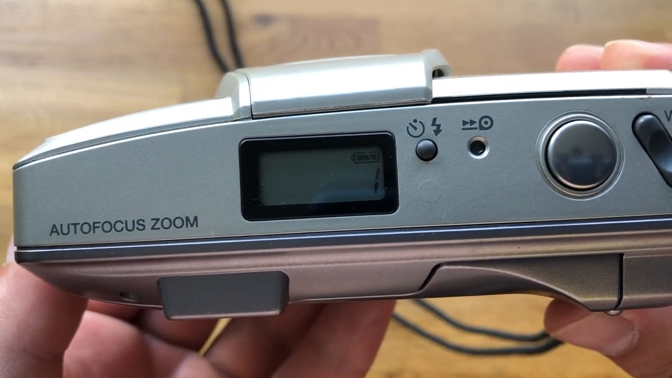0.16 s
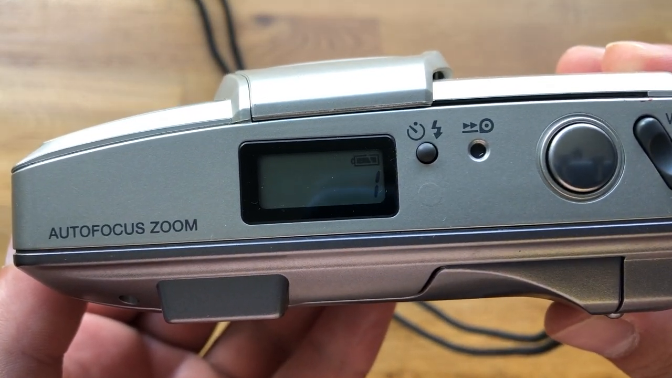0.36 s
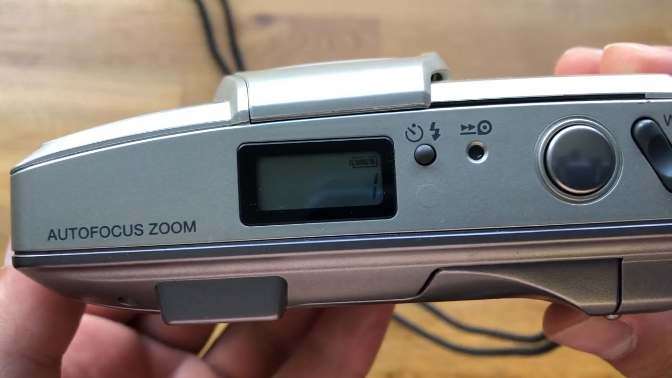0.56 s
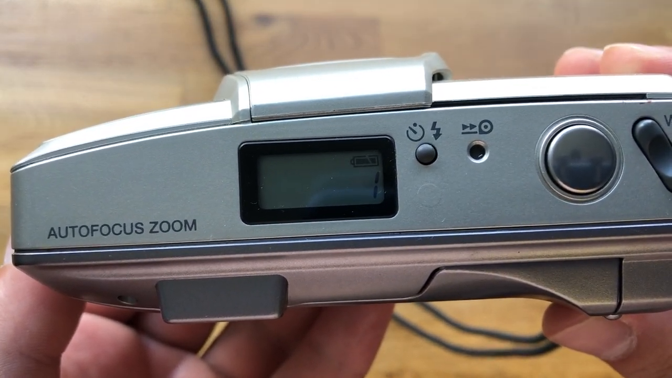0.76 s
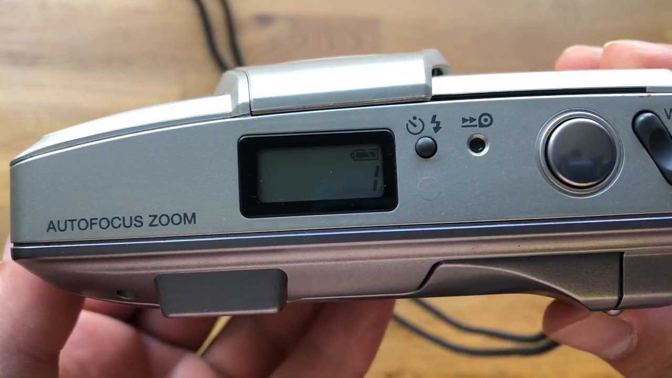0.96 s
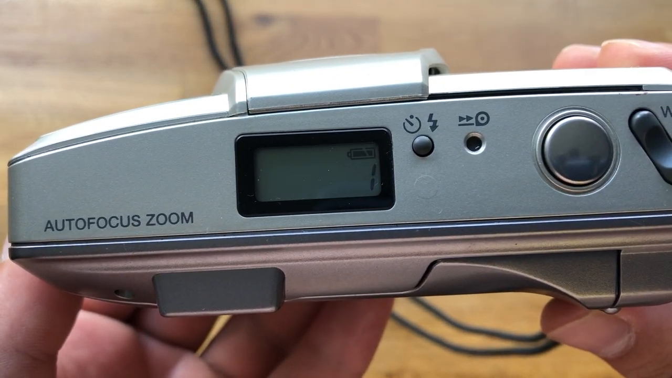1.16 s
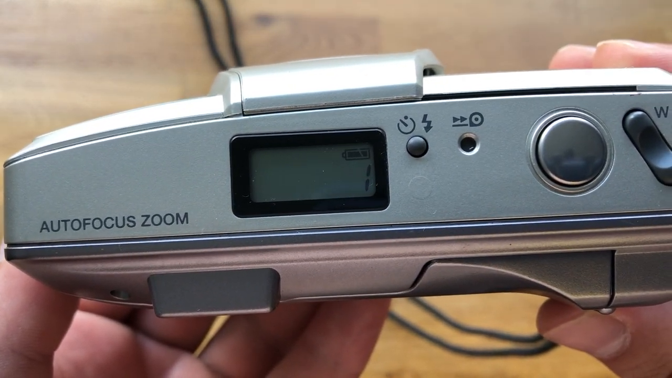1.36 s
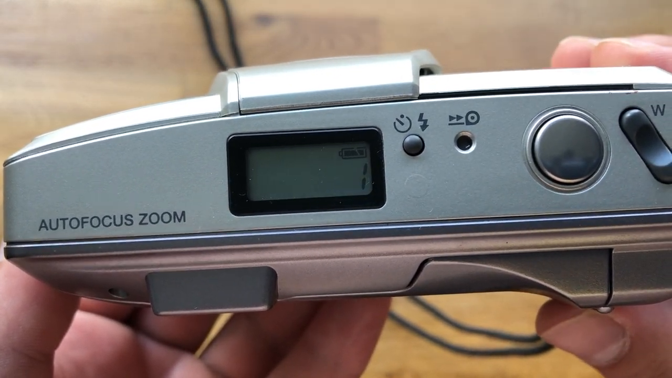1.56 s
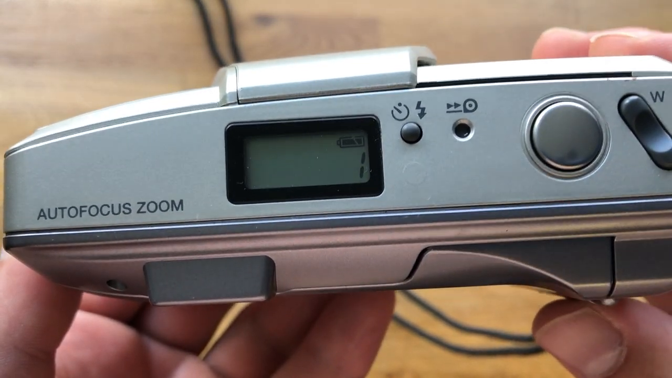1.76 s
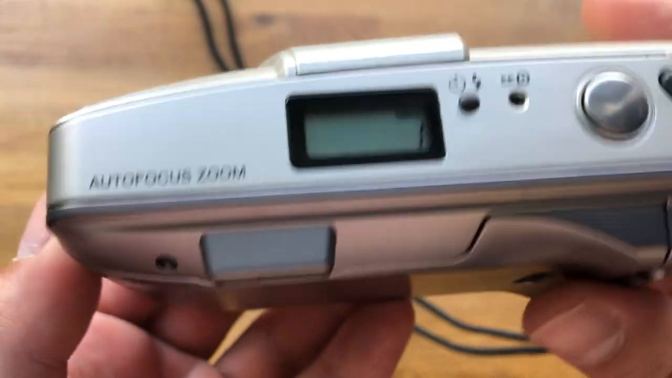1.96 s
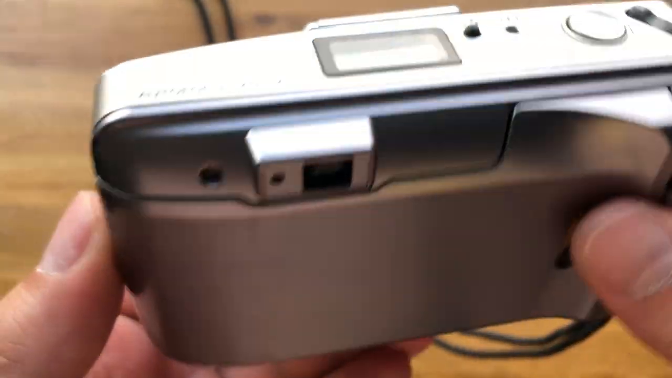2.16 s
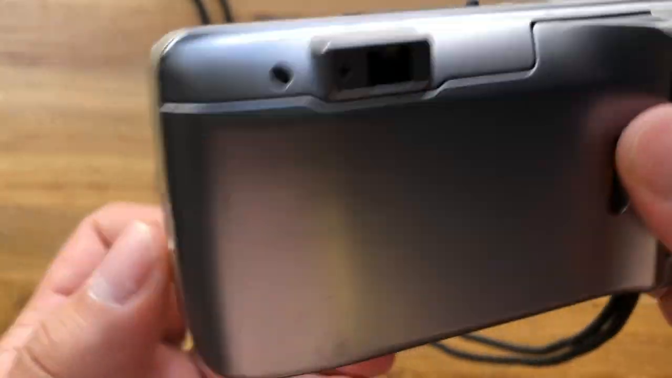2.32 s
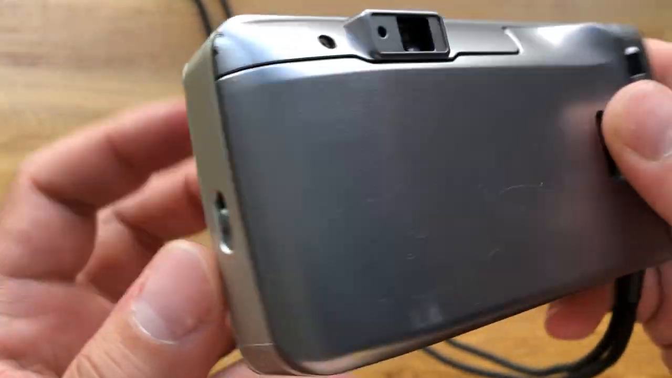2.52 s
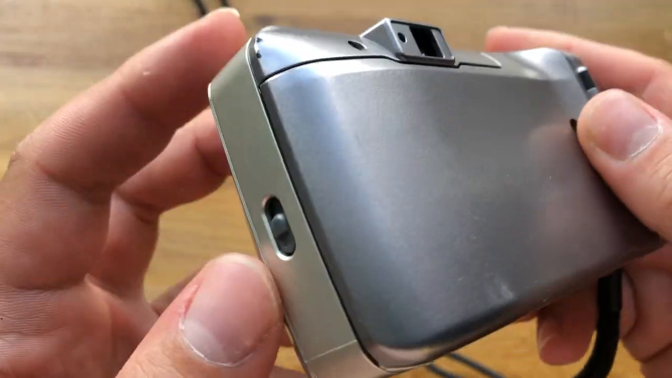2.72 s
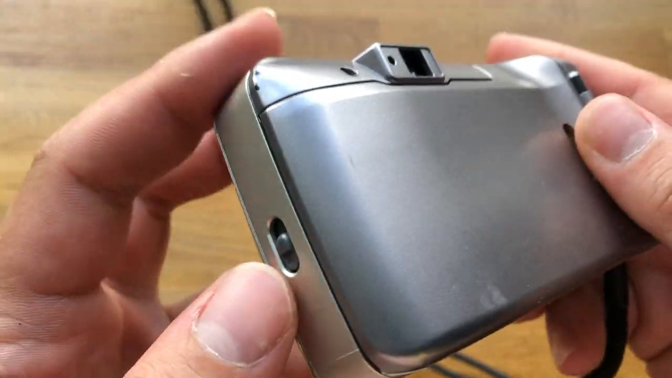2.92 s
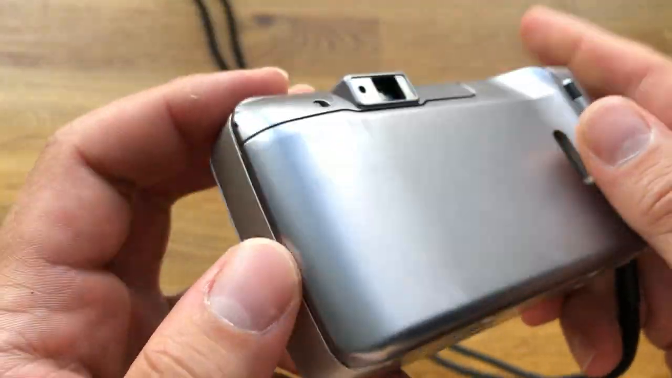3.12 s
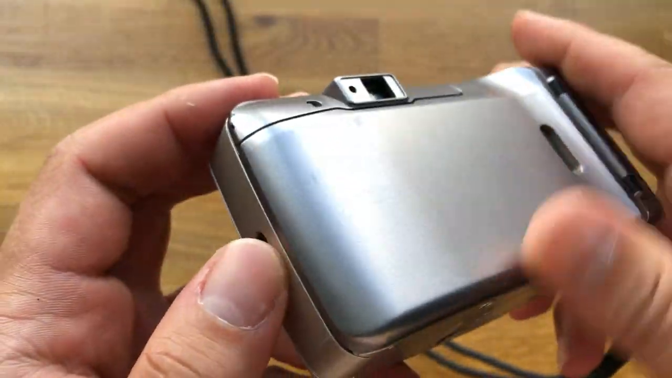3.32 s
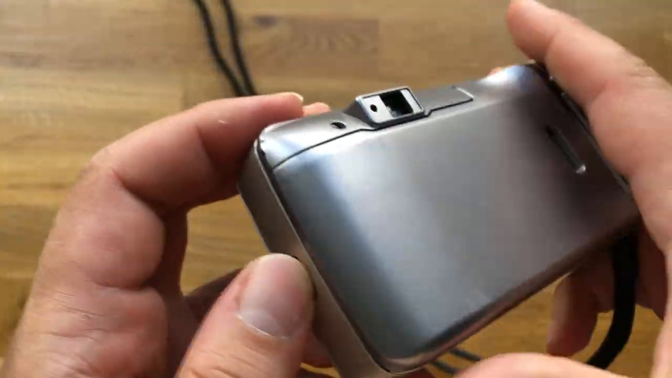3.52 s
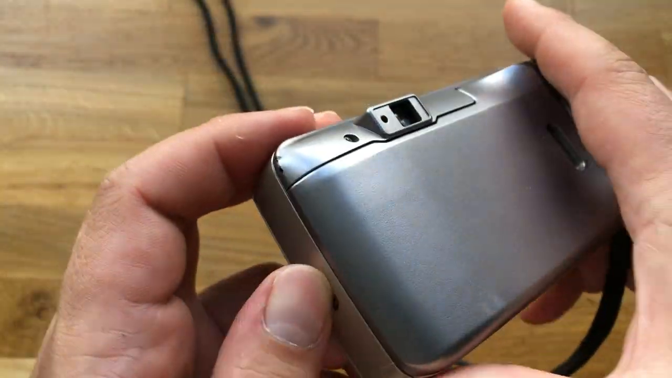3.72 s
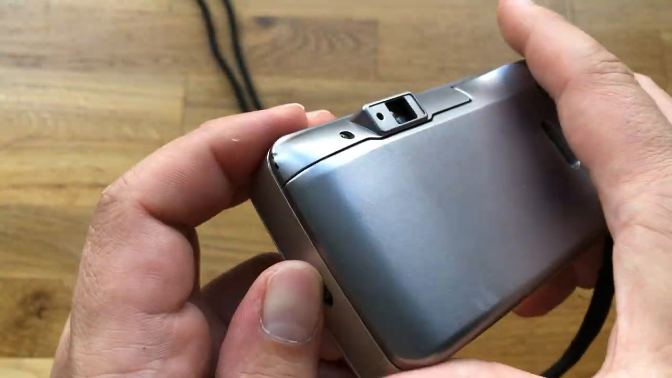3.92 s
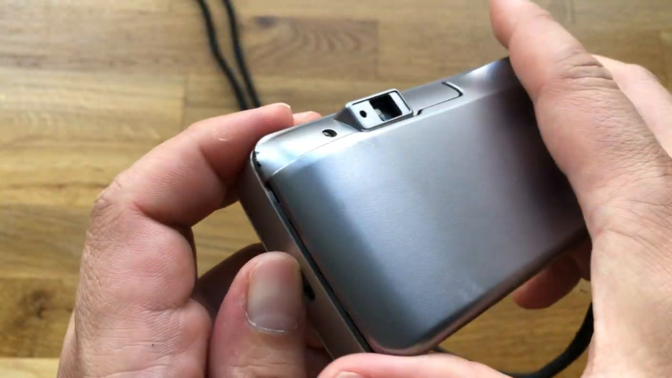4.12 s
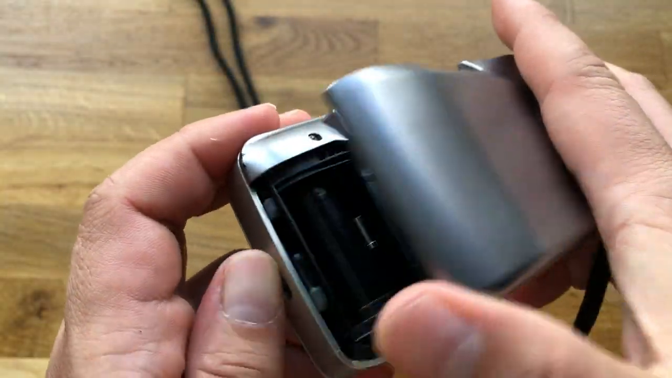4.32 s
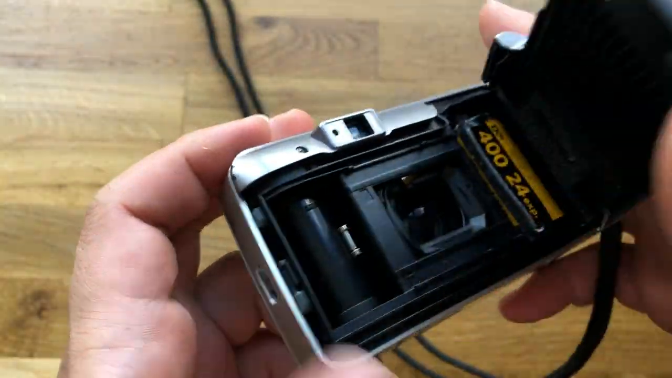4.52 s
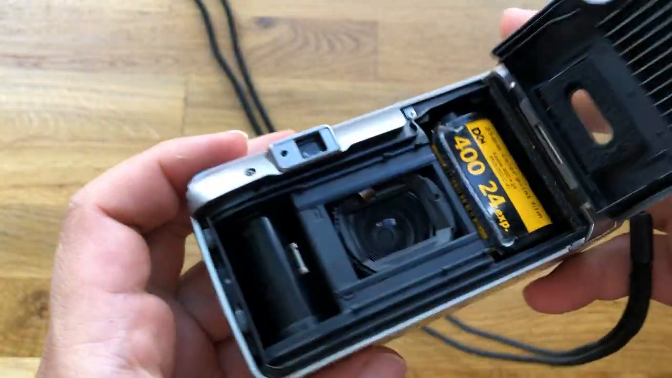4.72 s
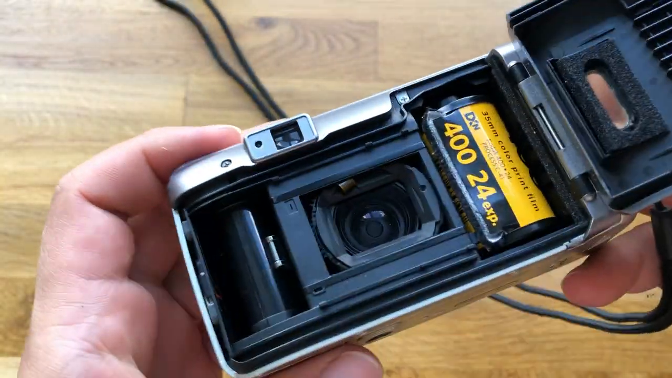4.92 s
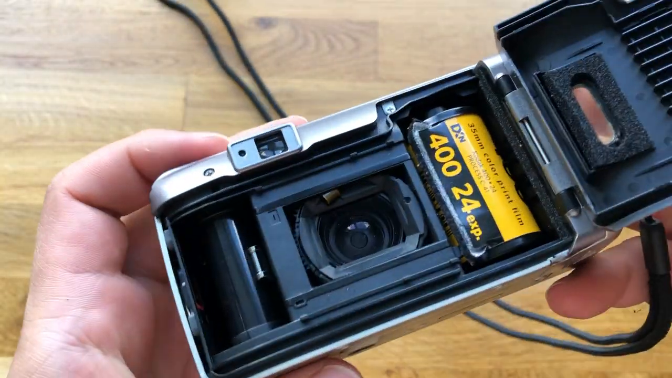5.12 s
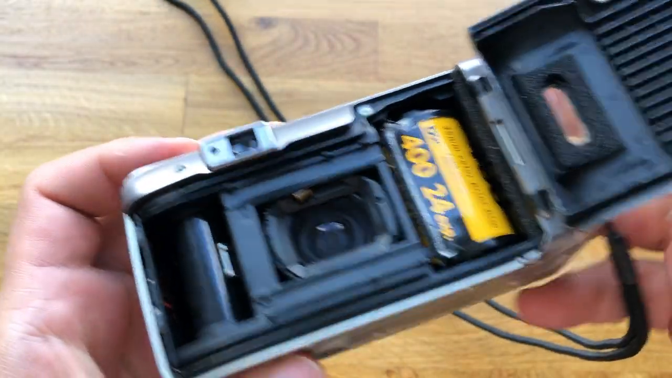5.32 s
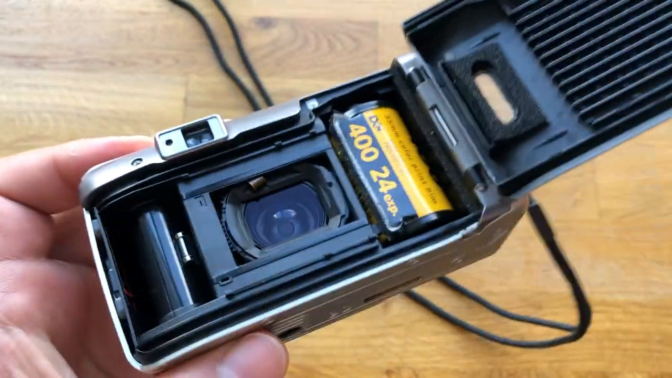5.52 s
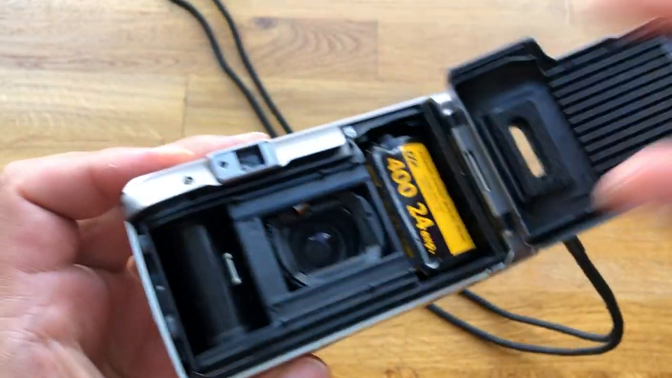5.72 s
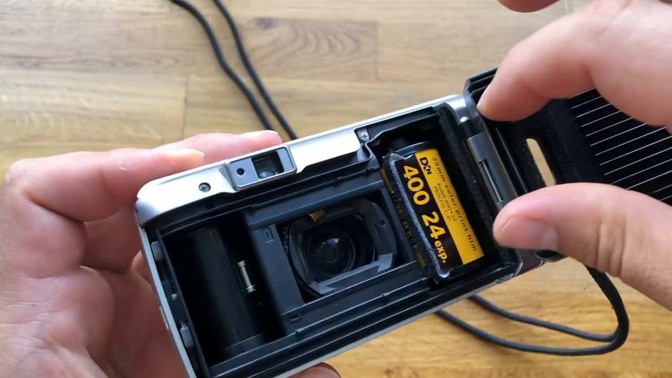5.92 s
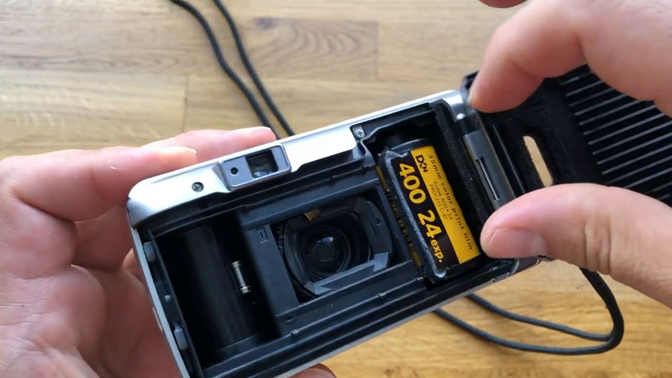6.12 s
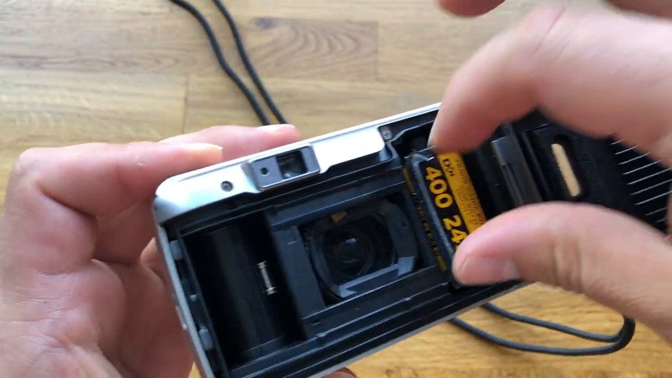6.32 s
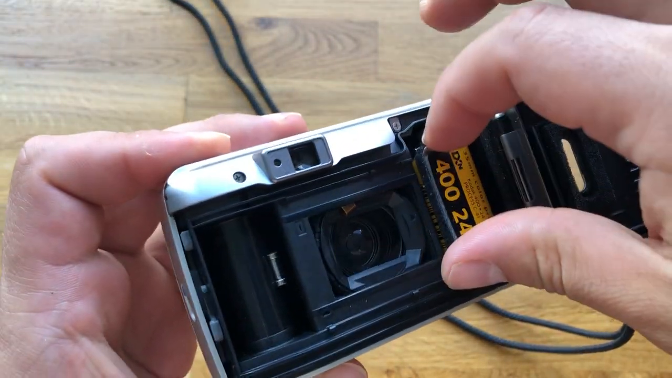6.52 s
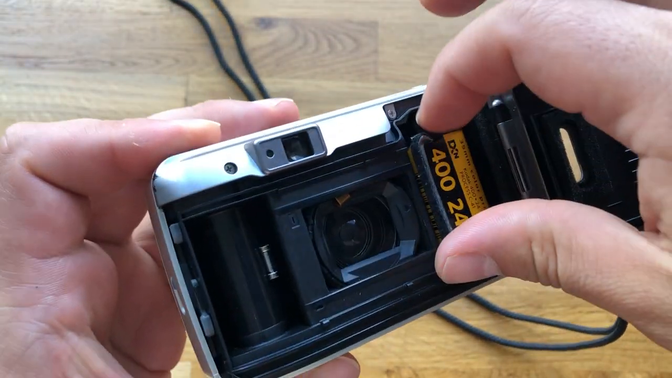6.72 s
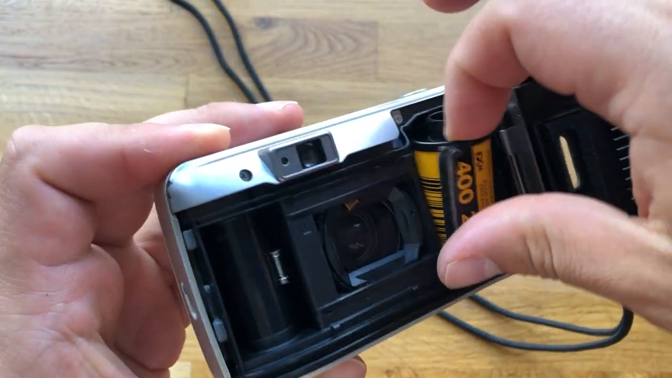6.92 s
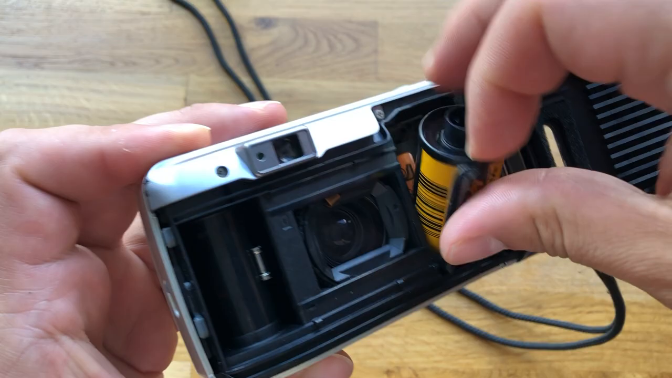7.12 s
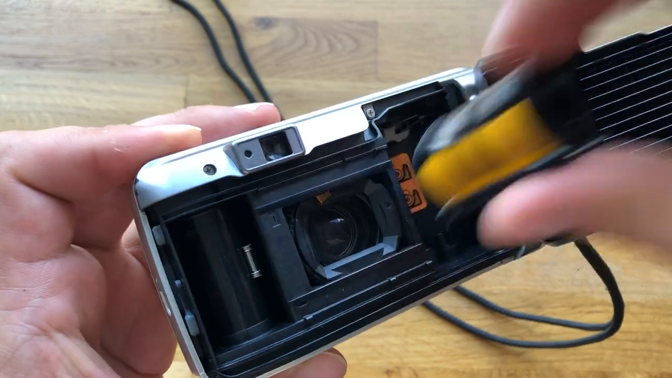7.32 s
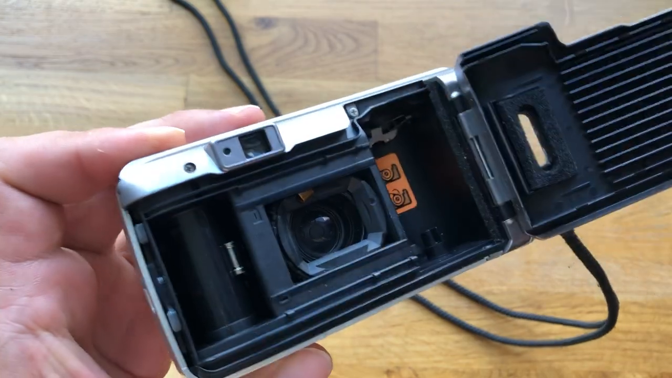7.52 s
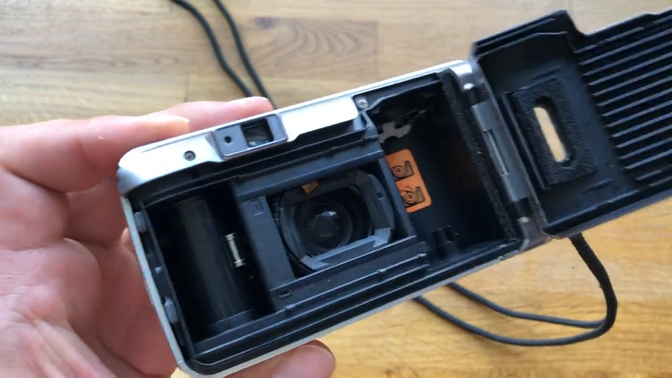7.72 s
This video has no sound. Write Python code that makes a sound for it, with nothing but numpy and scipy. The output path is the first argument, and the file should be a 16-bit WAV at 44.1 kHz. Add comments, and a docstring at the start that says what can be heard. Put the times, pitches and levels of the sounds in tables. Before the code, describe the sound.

Very close, in a small room with short soft reflections and dull low rumble, a compact camera's motor is already rewinding: a thin high whine near 1.8 to 1.9 kHz with bright overtones and dry gear rattle. The pitch dips and recovers around 0.8, 1.8, 2.8 and 3.7 seconds, climbing slightly overall. Faint clicks at 1.2 and 1.75 lead to a sharp cluster at 2.1 to 2.3 as the camera turns and the rattle becomes louder and changes colour. The whine swells at 3.9, then stops at about 4.13 with a bright latch snap, plastic ring and thud. From 4.62 to 4.95 the gears buzz briefly, falling into slowing rasps. Near quiet follows, with hinge clicks around 5.9, light clicks and brushing around 6.5, then crisp cartridge knocks at 6.95, smaller knocks and scrapes to 7.4 with a tiny metallic ring, and a last soft brush near 7.65.

```python
"""The motor of a compact camera whines as it rewinds the film, turned over in the hands in a small room.
Its gears make tones and rattle at the tooth rate; film drag slows them and the plastic case colours them.
The back unlatches with a snap, made of noise bursts and decaying sines, and the gears spin once more.
Then brushing noise, knocks and scrapes tell of the film cartridge being worked out of its chamber."""
import sys
import numpy as np
from scipy import signal
from scipy.fft import rfft, irfft, next_fast_len
from scipy.io import wavfile
from scipy.ndimage import uniform_filter1d, map_coordinates

SR = 44100
rng = np.random.default_rng(int(sys.argv[2]) if len(sys.argv) > 2 else 0)


def pcm_store(signal):
    """Save signal as 16-bit PCM."""
    levels = np.round(np.clip(np.atleast_2d(signal), -1, 1) * 32767)
    wavfile.write(sys.argv[1], SR, levels.astype(np.int16).T)


N = 342657
T = np.arange(N) / SR  # time of every sample [s]

PINION_TEETH, WHEEL_TEETH = 9, 22
STOP_S = 4.13  # the rewind ends
# as the film runs out, the tooth rate between drags climbs from slow to fast
SLOW_HZ, FAST_HZ = 1828.6, 1947.6
CLIMB_START_S, CLIMB_S = 1.45, 1.2
# the film drags about once a second and slows the motor:
# (tightest moment [s], speed loss [Hz], tightening [s], easing [s])
FILM_DRAGS = [(-0.204, 57.3, 0.2, 0.13), (0.776, 125.4, 0.186, 0.29), (1.767, 140.3, 0.207, 0.26),
              (2.815, 157.8, 0.269, 0.117), (3.746, 114.5, 0.168, 0.15)]
FULL_DRAG_HZ = 150
OVERRUN_HZ, OVERRUN_LAG_S, OVERRUN_S = 15, 0.44, 0.1  # slack film after a drag: a little too fast
RELEASE_HZ_PER_S, RELEASE_DB = 1200, -14  # strained teeth make the octave: it drops as speed returns
PRESS_S, PRESS_RISE_S, PRESS_DB = 3.9, 0.072, 10  # the thumb bears on the latch and the whine grows
# the hands turn the camera from top to edge, then from edge to back: (start [s], length [s])
CAMERA_TURNS = [(2.119, 0.32), (2.833, 0.058)]
# gear rattle from top, edge and back: (running free [dB], change at full drag [dB])
RATTLE_LEVELS = [(-43.5, 0.5), (-39, -1.4), (-38.5, -3)]
# multiples 3 to 7 of the tooth rate: (driving the top of the case [dB], heard from the back [dB])
TOOTH_OVERTONES = [(-56, -58.5), (-51.5, -67), (-42, -63.5), (-45, -58), (-48, -61)]
# side tones of off-centre gears, one row for multiples 1, 2, 3, then 4 and up:
# (one pinion turn below [dB], one wheel turn above [dB], one pinion turn above [dB])
GEAR_SIDEBANDS = [(-28, -11, -10.5), (-10, -8, -23.5), (-13.5, -3, -2.5), (-8.5, -18, -8)]
# which multiples of the shaft speed the motor hums on
SHAFT_MULTIPLES = (3, 5, 6, 8, 10, 12)
# the motor's own hum on those multiples: (from the top [dB], from the back [dB])
SHAFT_HUM_LEVELS = [(-73.5, -77.5), (-88.5, -73), (-78, -81), (-78.5, -71), (-61.5, -65), (-66, -61)]
# how each side of the case, and the open case, passes sound on: (frequency [Hz], relative level [dB])
TOP_COLOUR = [(500, -20), (1550, -28.5), (2000, -12), (2300, -13), (3050, -0.5), (3650, -2.5), (4050, -12),
              (5000, -19), (5950, -1.5), (6750, -9), (7200, 2.5), (7700, -8.5), (9100, -10), (10000, -17),
              (12700, -5), (13650, -26), (14450, 1), (15100, -18.5)]
EDGE_COLOUR = [(500, -40), (1450, -32.5), (2100, -8), (2700, -3.5), (3100, 5), (3330, -15.5), (3650, 0),
               (4400, -6), (5800, 0), (8100, 2), (10400, -7), (11200, -5), (11900, -4.5), (13000, -0.5),
               (15500, 1)]
BACK_COLOUR = [(500, -43.5), (1650, -30), (2050, -7.5), (2350, -15), (2650, 1), (2950, -13.5), (3180, -4.5),
               (3500, -11), (4600, -10.5), (6000, -3.5), (7100, -4), (8100, 4), (9100, -10), (11000, -10),
               (14500, -3)]
OPEN_COLOUR = [(700, -57), (1350, -24), (1750, -9), (2250, 4.5), (2550, 2), (3450, 3.5), (4700, -2),
               (5400, -11), (6250, -2), (7200, -10), (8100, 1), (9400, -9), (11300, 3), (13000, -2),
               (16000, -1.5)]
# narrow resonances that lift a tone as the speed crosses them: (centre [Hz], width [Hz], level [dB])
TOP_RESONANCES = [(1691.3, 15, -42.5), (1820, 91, -54), (1876, 110, -54), (3478, 220, -44),
                  (3710, 100, -52), (5207, 92, -55), (5506, 210, -53.5), (7100, 350, -53)]
EDGE_RESONANCES = [(1880, 110, -60.5), (3688, 180, -46.5), (6130, 333, -54)]
BACK_RESONANCES = [(1197, 41, -65), (1886, 30, -56.5), (1920, 59, -57.5), (3648, 164, -43), (3946, 38, -49),
                   (5800, 420, -56), (7500, 420, -59.5)]

# background rumble: (frequency [Hz], relative level [dB])
RUMBLE_COLOUR = [(15, -48), (25, -13), (114, -2), (320, -6.5), (680, -15), (1150, -12), (1740, -18),
                 (2400, -28), (8360, -42), (16000, -40.5)]
RUMBLE_DB, HUM_HZ = -57.5, 115.7
# background hum, before its slow wavering: (time [s], level [dB])
HUM_LEVEL = [(4.3, -73), (4.85, -62), (5.4, -72)]
# how fast the room's echo dies: (frequency [Hz], time to fade by 60 dB [s])
ECHO_DECAY = [(1000, 0.59), (14000, 0.26)]

# clicks of case, latch and door: (time [s], snap [dB], ring [dB], thud [dB])
CLICKS = [(1.229, -43, -64, -62), (1.753, -57, -45.5, -53), (2.074, -46.5, -58, -55),
          (2.1969, -26.5, -39, -44), (2.2613, -36.5, -46, -44), (2.2829, -45, -48.5, -47),
          (3.909, -53, -47, -65), (4.1478, -41, -45, -30.5), (4.901, -52, -57.5, -73),
          (5.9105, -43, -50.5, -56), (5.9322, -52, -50.5, -68.5), (6.4345, -46, -49.5, -58.5)]
# spectrum of snaps and brushing: (frequency [Hz], relative level [dB])
SNAP_COLOUR = [(1500, -12.5), (3800, 1.5), (5400, 1), (8000, 3), (13000, 2), (16000, -1)]
# ringing of the case, low and high, before chance shifts:
# (frequency [Hz], relative level [dB], time to fade by 60 dB [s])
CASE_THUD_MODES = [(127.4, -21, 0.14), (237, -12.5, 0.1), (319, -2, 0.059), (445, 5.5, 0.042)]
CASE_RING_MODES = [(793, -3.5, 0.0429), (1096, -1.5, 0.022), (1393, 2.5, 0.038), (1720, 3, 0.033),
                   (1970, 0.5, 0.037), (3106, -7.5, 0.017)]
# thin, bright ticks: latch bounces, small case ticks, the last flick of the gears, then the hinge:
# (time [s], level [dB])
TICKS = [(4.1475, -23), (4.158, -41), (4.163, -35), (4.168, -40), (4.174, -43.5), (4.199, -45),
         (4.382, -60), (4.573, -60), (4.936, -59), (5.013, -62), (5.912, -48), (5.933, -39)]
# spectrum of those ticks: (frequency [Hz], relative level [dB])
TICK_COLOUR = [(4500, -13), (7000, -14), (10000, -7), (13000, -5.5)]
DOOR_S, DOOR_DB = 4.1478, -28.5
# the back door, ringing as it springs free:
# (frequency [Hz], relative level [dB], time to fade by 60 dB [s])
DOOR_MODES = [(1005, 0.5, 0.041), (1160, 3, 0.02), (1680, -1.5, 0.04), (3030, 5, 0.0079), (4200, 5, 0.0093)]
# fingertips brushing case and cartridge: (start [s], length [s], level at the middle [dB])
BRUSHES = [(4.27, 0.076, -57.5), (5.392, 0.1, -68.5), (6.023, 0.13, -67), (6.622, 0.17, -65),
           (7.588, 0.18, -64)]

# short spin after the back opens: driven briefly, then slowed by friction until the gears stick
SPIN_START_S, SPIN_CUT_S, SPIN_END_S = 4.622, 4.674, 4.945
SPIN_HZ, SPIN_UP_S, BRAKE_HZ_PER_S = 1437, 0.008, 4400
SPIN_DB, SPIN_DB_PER_OCTAVE = -43.5, 6
TAUT_DB, SLACK_S = -6, 4.657  # teeth in quiet contact until the train stops gaining speed
SPIN_WHINE_DB = -9.5  # the clean tooth rate among the rattle
SPIN_KNOCK_DB = 7.5  # as the gears slow, each wheel turn stands out as a separate rasp
SIZZLE_HZ, SIZZLE_T60 = 6230, .007  # a resonance that sings only at high speed
SIZZLE_DB, SIZZLE_POWER = -3.5, 5.5

# fingers and cartridge sliding on plastic: (start [s], length [s], hiss [dB], ring [dB])
SLIDE_EVENTS = [(5.906, 0.046, -55, -56.5), (6.958, 0.014, -44, -39.5), (7.19, 0.05, -65.5, -54),
                (7.354, 0.022, -46, -46.5)]
# cartridge against its chamber: (time [s], snap [dB], ring [dB])
KNOCKS = [(6.519, -69, -56.5), (6.917, -53, -56), (6.9639, -36, -35), (6.968, -45, -32),
          (6.9803, -48, -36.5), (7.103, -56.5, -45), (7.23, -58, -50), (7.3158, -51.5, -55.5),
          (7.371, -51, -45), (7.378, -41.5, -53), (7.655, -62, -58)]
# ringing of the metal cartridge, then of its thin rim, before chance shifts:
# (frequency [Hz], relative level [dB], time to fade by 60 dB [s])
CARTRIDGE_MODES = [(973, 0.5, 0.018), (1280, 6.5, 0.007), (1666, 3, 0.023), (2240, 3, 0.015),
                   (2790, 2.5, 0.017), (3800, 0.5, 0.0055)]
RIM_MODES = [(7500, 1, 0.034), (11760, -8, 0.037)]
RIM_S, RIM_DB = 7.369, -42

CUTOFF_HZ = 15900  # top of the recorder's band
BLOW = np.sqrt(SR / 100)  # turns energy 1 into rms 1 over 10 ms


def amp(db):
    """Turns decibels into gain."""
    return 10 ** (np.asarray(db) / 20)


def unit(x):
    """Scales to an average (rms) strength of 1."""
    return x / np.sqrt(np.mean(x ** 2) + 1e-20)


def ramp(start_s, length_s):
    """Rises steadily from 0 to 1."""
    return np.clip((T - start_s) / length_s, 0, 1)


def read(points, hz):
    """Reads a table between its points, on a log-frequency axis."""
    f, value = np.transpose(points)
    return np.interp(np.log(hz + 1), np.log(f), value)


def colour(x, points):
    """Filters a sound with the given spectrum, without any sound ahead of its cause."""
    size = 4096
    log_gain = np.log(amp(read(points, abs(np.fft.fftfreq(size, 1 / SR)))))
    # the Hilbert transform supplies the phase that puts the energy as early as possible
    taps = np.fft.ifft(np.exp(np.conj(signal.hilbert(log_gain)))).real
    return signal.oaconvolve(x, taps[:size // 2])[:len(x)]


def wander(hz):
    """Slow random drift of rms 1, up to about hz."""
    size = next_fast_len(N, True)
    f = np.fft.rfftfreq(size, 1 / SR)
    spectrum = rfft(rng.standard_normal(size)) / (1 + (f / hz) ** 2)
    return unit(irfft(spectrum, size)[:N])


def add(mix, s, sound):
    """Mixes a sound in at time s."""
    part = mix[max(round(s * SR), 0):][:len(sound)]
    part += sound[:len(part)]


def ring(modes, grip=0.062, place_db=2):
    """Decaying sines of a struck body, energy 1; grip shifts each pitch, place of the blow each level."""
    t = np.arange(SR // 5) / SR
    out = np.zeros(len(t))
    for k, (hz, db, t60) in enumerate(modes):
        place_chance, grip_chance = rng.standard_normal(2)
        level = amp(db + place_db * place_chance - 60 * t / t60)
        out += (-1) ** k * level * np.sin(2 * np.pi * hz * (1 + grip * grip_chance) * t)
    return out / np.linalg.norm(out)


def peaks_db(peaks, hz):
    """Level of a tone at hz among narrow resonances."""
    power = sum((amp(db) / (1 + (2 * (hz - centre) / width) ** 2)) ** 2 for centre, width, db in peaks)
    return 10 * np.log10(power)


def film_drag():
    """Speed lost to the film [Hz]: each drag tightens to a rounded peak, then lets go and leaves slack."""
    sag_hz = np.zeros(N)
    for s, depth_hz, tighten_s, ease_s in FILM_DRAGS:
        width_s = np.where(T < s, tighten_s, ease_s)
        sag_hz += depth_hz / (1 + ((T - s) / width_s) ** 2) ** 2
        sag_hz -= OVERRUN_HZ * np.exp(-((T - s - OVERRUN_LAG_S) / OVERRUN_S) ** 2)
    return sag_hz


def rattle(teeth, repeat, bite, lumpy_db):
    """Tooth sides scrape once per tooth; the same flaws return with every turn of pinion and wheel."""
    scrape, blow_db = 0, 0
    for count in (PINION_TEETH, WHEEL_TEETH):
        flaws = rng.standard_normal(count * 20)
        place = teeth % count * 20
        scrape = scrape + unit(map_coordinates(flaws, [place], order=3, mode="grid-wrap"))
        blow_db = blow_db + unit(rng.standard_normal(count))[teeth.astype(int) % count]
    repeat = np.clip(repeat, 0, 1)
    grit = np.sqrt(repeat) * unit(scrape) + np.sqrt(1 - repeat) * rng.standard_normal(N)
    return unit(grit * np.exp(bite * np.cos(2 * np.pi * teeth)) * amp(lumpy_db * blow_db))


def whine(teeth, levels_db, order, play, flutter_db, fuzz):
    """Multiples of the tooth rate, with side tones of off-centre gears; loose play blurs the high ones."""
    slack = play * wander(60.25)
    offsets = (0, -1 / PINION_TEETH, 1 / WHEEL_TEETH, 1 / PINION_TEETH)
    out = np.zeros(N)
    for k, db in enumerate(levels_db, order):
        sides = GEAR_SIDEBANDS[min(k, len(GEAR_SIDEBANDS)) - 1]
        sides_db = [side_db + 3 * wander(14) for side_db in sides]  # each wavers by itself
        lines = np.zeros(N)
        for offset, line_db in zip(offsets, (0, *sides_db)):
            turns = (k + offset) * (teeth + slack) + rng.random()
            lines += amp(line_db) * np.cos(2 * np.pi * turns)
        uneven = 1 + fuzz * (k - 1) * wander(420)  # tooth blows differ
        out += np.sqrt(2) * amp(db + flutter_db * wander(34)) * unit(uneven) * lines
    return out


def off_the_hands(x, side, strength, delay_s, shift_s):
    """Echo off the hands; its path changes as the camera turns, so notches sweep through the treble."""
    delay = delay_s + shift_s * side * (1 + 0.24 * wander(0.79))
    echo = map_coordinates(x, [np.arange(N) - delay * SR], order=3)
    return unit(x + strength * np.clip(side, 0, 1) * echo)


def regrip(x, side):
    """Small resonances of the case come and go in the treble while the fingers shift around it."""
    hz, t, z = signal.stft(x, SR, nperseg=512)
    field = rng.standard_normal(z.shape)
    for _ in range(2):  # smooth across frequency, then time
        field = uniform_filter1d(uniform_filter1d(field, 3, 0), 40, 1)
    turned = np.interp(t, T, np.clip(side, 0, 1))
    depth_db = 2.4 * np.clip(hz / 5000, 0, 1)[:, None] * turned
    return unit(signal.istft(z * amp(depth_db * unit(field)), SR)[1][:N])


def shaft_hum(teeth, tooth_hz, side, back_share):
    """The motor hums on multiples of its shaft speed, lifted by resonances seen from the back."""
    shaft = teeth / PINION_TEETH + 0.0072 * wander(70)  # loose bearings roughen the higher multiples
    out = np.zeros(N)
    for k, (top, back) in zip(SHAFT_MULTIPLES, SHAFT_HUM_LEVELS):
        lift = back_share * amp(peaks_db(BACK_RESONANCES, k * tooth_hz / PINION_TEETH))
        level = amp(top + (back - top) * side / 2) + lift
        out += np.sqrt(2) * np.sin(2 * np.pi * k * shaft) * level
    return out


def rewind():
    """The loaded gear train, heard through whichever side of the case faces us."""
    sag_hz = film_drag()
    tooth_hz = SLOW_HZ + (FAST_HZ - SLOW_HZ) * ramp(CLIMB_START_S, CLIMB_S) - sag_hz
    teeth = np.cumsum(tooth_hz * (1 + .001 * wander(12))) / SR  # teeth passed so far
    side = sum(ramp(*turn) for turn in CAMERA_TURNS)  # 0 top, 1 edge, 2 back
    turned = np.clip(side, 0, 1)
    shares = [np.clip(1 - abs(side - k), 0, 1) for k in range(len(RATTLE_LEVELS))]

    rattle_db = 0.5 * wander(7)
    for share, (free, drag) in zip(shares, RATTLE_LEVELS):
        rattle_db = rattle_db + share * (free + drag * sag_hz / FULL_DRAG_HZ)
    drive = rattle(teeth, repeat=0.18, bite=1.0, lumpy_db=2.5)
    faces = (TOP_COLOUR, EDGE_COLOUR, BACK_COLOUR)
    case = sum(np.sqrt(share) * unit(colour(drive, face)) for share, face in zip(shares, faces))
    case = off_the_hands(case, side, strength=0.42, delay_s=0.00044, shift_s=0.0001197)
    case = regrip(case, side)

    # a tone swells when the speed carries it onto a resonance of the case
    resonances = (TOP_RESONANCES, EDGE_RESONANCES, BACK_RESONANCES)
    levels_db = [sum(share * peaks_db(peaks, k * tooth_hz) for share, peaks in zip(shares, resonances))
                 for k in range(1, 5)]
    levels_db[0] = levels_db[0] + PRESS_DB * ramp(PRESS_S, PRESS_RISE_S)
    regain = np.clip(np.gradient(tooth_hz, T) / RELEASE_HZ_PER_S, 0, 1)
    levels_db[1] = levels_db[1] + RELEASE_DB * regain ** 2
    tones = whine(teeth, levels_db, order=1, play=0.0087, flutter_db=1.1, fuzz=0.15)

    overtones_db = [top + (back - top) * turned for top, back in TOOTH_OVERTONES]
    overtones = whine(teeth, overtones_db, order=3, play=0.02, flutter_db=0.6, fuzz=0.29)
    tones = tones + (1 - turned) * colour(overtones, TOP_COLOUR) + turned * overtones
    hum = shaft_hum(teeth, tooth_hz, side, shares[2])
    return (amp(rattle_db) * case + tones + hum) * (1 - ramp(STOP_S, 0.018))


def room_tone():
    """Dull background rumble of filtered noise, with a wavering hum."""
    noise = unit(colour(rng.standard_normal(N), RUMBLE_COLOUR))
    rumble = amp(RUMBLE_DB + 0.27 * wander(8.1)) * noise
    hum = unit(np.cos(2 * np.pi * HUM_HZ * T + 0.92 * wander(4.1)))
    hum_db = np.interp(T, *np.transpose(HUM_LEVEL))
    return rumble + amp(hum_db + 3 * wander(5.5)) * hum


def room(x):
    """A small room: sparse reflections, each band dying at its own speed."""
    size = SR // 2
    taps = rng.standard_normal(size) * (rng.random(size) < .1)
    taps = taps * (np.arange(size) > .004 * SR)  # nothing comes back in the first 4 ms
    hz, t, z = signal.stft(taps, SR, nperseg=256)
    fade = amp(-60 * t / read(ECHO_DECAY, hz)[:, None])
    tail = signal.istft(z * fade, SR, nperseg=256)[1]
    return signal.oaconvolve(x, tail / np.linalg.norm(tail))[:N]


def snap(decay_s, chatter_db):
    """A sharp crack of plastic with a short chatter after it, as fading noise of energy 1."""
    t = np.arange(SR // 20) / SR
    fade = np.exp(-t / decay_s) + amp(chatter_db) * np.exp(-t / 0.0089)
    out = colour(rng.standard_normal(len(t)) * fade, SNAP_COLOUR)
    return out / np.linalg.norm(out)


def case_clicks():
    """Blows on the plastic crack, ring the case and thud through its body."""
    out = np.zeros(N)
    for s, snap_db, ring_db, thud_db in CLICKS:
        add(out, s, BLOW * amp(snap_db) * snap(decay_s=0.0012, chatter_db=-13.0))
        add(out, s, BLOW * amp(ring_db) * ring(CASE_RING_MODES))
        # the whole body answers a moment later
        add(out, s + 0.0016, BLOW * amp(thud_db) * ring(CASE_THUD_MODES))
    return out


def ticks():
    """Thin, bright ticks of latch, case, gears and hinge: 10 ms bursts of fast-fading noise."""
    out, t = np.zeros(N), np.arange(SR // 10 // 10) / SR
    for s, db in TICKS:
        burst = rng.standard_normal(len(t)) * np.exp(-t / 0.0015)
        add(out, s, amp(db) * unit(colour(burst, TICK_COLOUR)))
    return out


def door():
    """The back door rings as it springs free."""
    out = np.zeros(N)
    add(out, DOOR_S, BLOW * amp(DOOR_DB) * ring(DOOR_MODES, grip=.005, place_db=1))
    return out


def fingers():
    """Soft, grainy brushing of skin on plastic: noise of uneven strength, swelling and fading."""
    brush = unit(colour(rng.standard_normal(N) * amp(7.8 * wander(93)), SNAP_COLOUR))
    return brush * sum(amp(db) * np.sin(np.pi * ramp(s, length)) for s, length, db in BRUSHES)


def coast():
    """The unloaded gears run down; their falling overtones flare across resonances of the open case."""
    driven = 1 - np.exp(-np.maximum(T - SPIN_START_S, 0) / SPIN_UP_S)
    lost_hz = BRAKE_HZ_PER_S * np.maximum(T - SPIN_CUT_S, 0)
    tooth_hz = np.maximum(SPIN_HZ * driven - lost_hz, 1)
    speed = tooth_hz / SPIN_HZ
    teeth = np.cumsum(tooth_hz * (1 + .02 * wander(300))) / SR
    running = (T > SPIN_START_S) & (T < SPIN_END_S)
    level_db = SPIN_DB + SPIN_DB_PER_OCTAVE * np.log2(speed) + TAUT_DB * (1 - ramp(SLACK_S, 0.011))
    wheel_pulse = np.cos(np.pi * teeth / WHEEL_TEETH) ** 4 * 1.19 - .5
    throb = amp(SPIN_KNOCK_DB * (1 - speed ** 2) * wheel_pulse)

    tones = np.zeros(N)
    for k in range(1, 15):
        tone = np.cos(2 * np.pi * (k * teeth + rng.random()))
        tones += amp(2 * wander(40)) * tone / np.sqrt(max(k, 4))
    grit = rattle(teeth, repeat=.3, bite=.8, lumpy_db=2)
    sizzle = signal.oaconvolve(grit, ring([(SIZZLE_HZ, 0, SIZZLE_T60)], grip=0))[:N]
    parts = (colour(tones, OPEN_COLOUR), colour(grit, OPEN_COLOUR), sizzle)
    tones, grit, sizzle = (part / np.std(part[running]) for part in parts)

    clean_whine = amp(SPIN_WHINE_DB) * speed ** 2 * np.sin(2 * np.pi * teeth)
    gears = .6 * tones + .8 * grit + clean_whine
    return amp(level_db) * throb * running * (gears + amp(SIZZLE_DB) * speed ** SIZZLE_POWER * sizzle)


def slides():
    """Sliding surfaces catch and slip: grainy noise that hisses and rings the metal cartridge."""
    out = np.zeros(N)
    for s, length, hiss_db, ring_db in SLIDE_EVENTS:
        # the surfaces catch every millisecond or so
        grains = np.repeat(amp(3 * rng.standard_normal(SR // 4)), 40)[:SR // 4]
        slips = (grains * rng.standard_normal(SR // 4))[:int(length * SR) + 2]
        slips = unit(slips * signal.windows.tukey(len(slips), .3))
        add(out, s, amp(hiss_db) * unit(colour(slips, SNAP_COLOUR)))
        add(out, s, amp(ring_db) * signal.fftconvolve(slips, ring(CARTRIDGE_MODES)))
    return out


def cartridge_knocks():
    """The cartridge hits its chamber: a crack, and the ring of the metal."""
    out = np.zeros(N)
    for s, snap_db, ring_db in KNOCKS:
        add(out, s, BLOW * amp(snap_db) * snap(decay_s=0.0025, chatter_db=-18.5))
        add(out, s, BLOW * amp(ring_db) * ring(CARTRIDGE_MODES))
    return out


def rim():
    """The cartridge's thin rim rings high as it scrapes clear."""
    out = np.zeros(N)
    add(out, RIM_S, BLOW * amp(RIM_DB) * ring(RIM_MODES, grip=0.0071, place_db=6))
    return out


def scene():
    """Camera and hands near by, the room behind them."""
    motor = rewind() + coast()
    hands = case_clicks() + ticks() + door() + fingers() + slides() + cartridge_knocks() + rim()
    echo = room(amp(-12) * motor + amp(-17) * hands)
    return (motor + hands + echo + room_tone())[None]


def record(dry):
    """The deepest bass is filtered away; then the recorder's band limit."""
    thin = signal.sosfilt(signal.butter(2, 42, "highpass", fs=SR, output="sos"), dry)
    band_limit = signal.firwin(401, CUTOFF_HZ, window=("kaiser", 8), fs=SR)
    return signal.oaconvolve(thin, band_limit[None], "same")


dry = scene()
out = record(dry)
pcm_store(out)
```